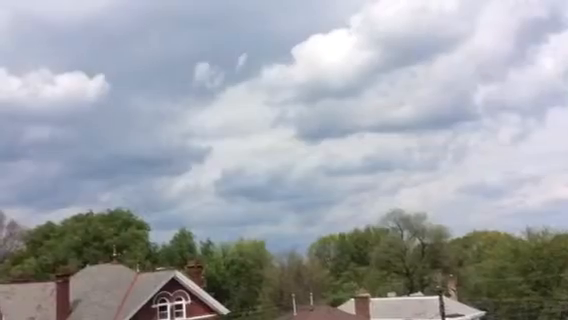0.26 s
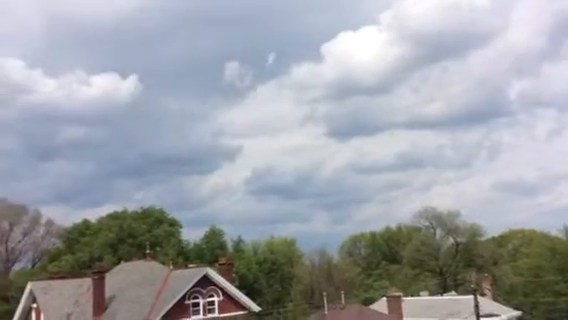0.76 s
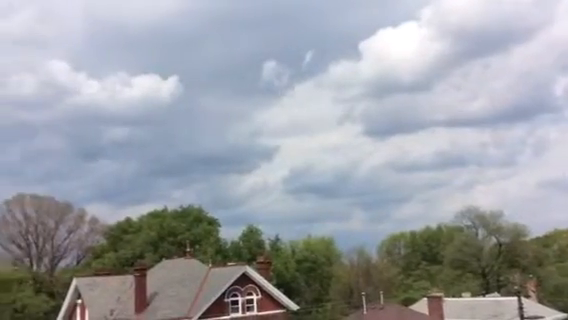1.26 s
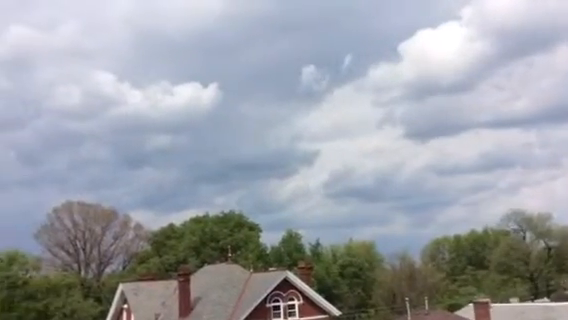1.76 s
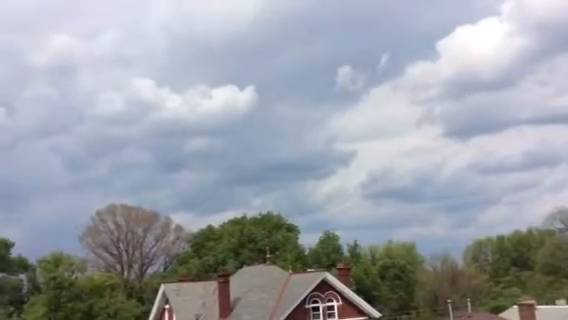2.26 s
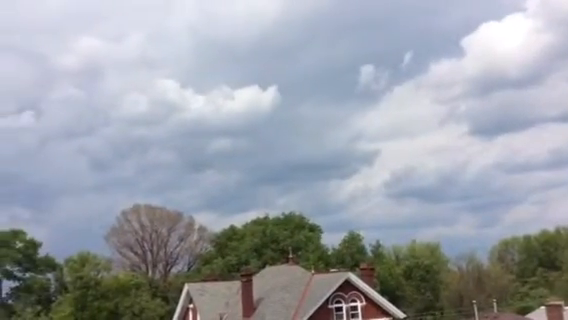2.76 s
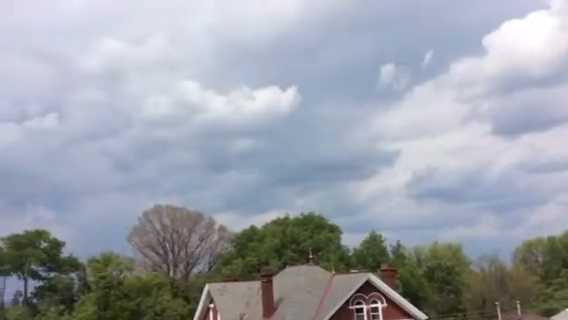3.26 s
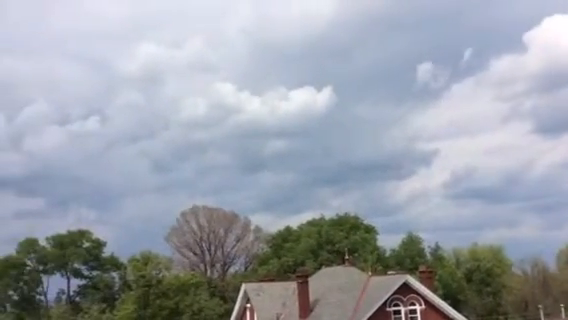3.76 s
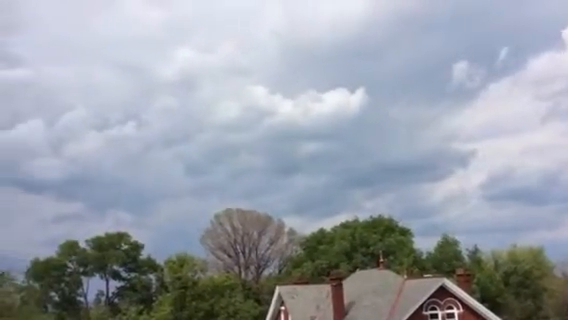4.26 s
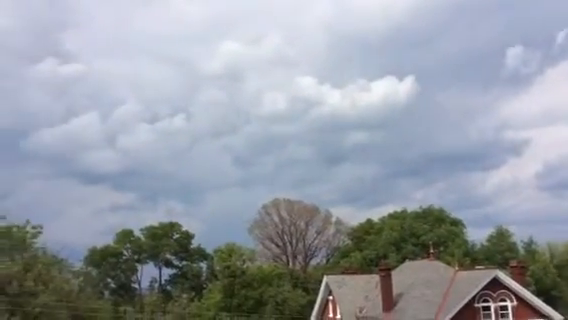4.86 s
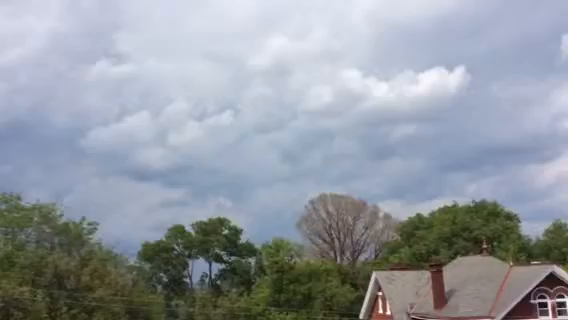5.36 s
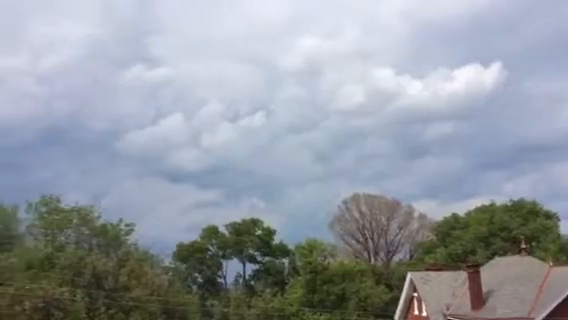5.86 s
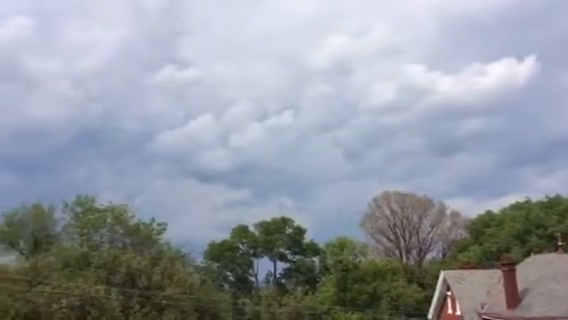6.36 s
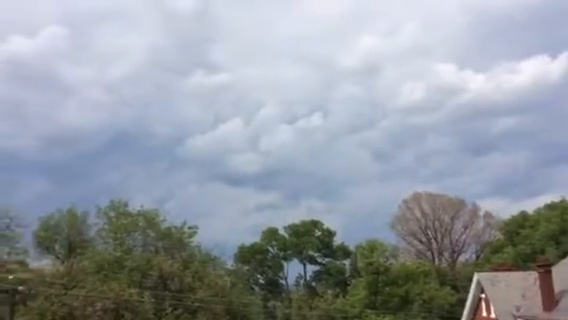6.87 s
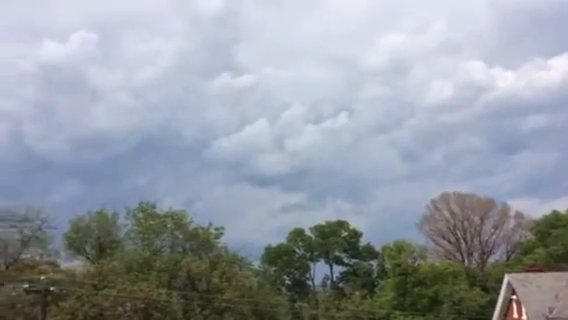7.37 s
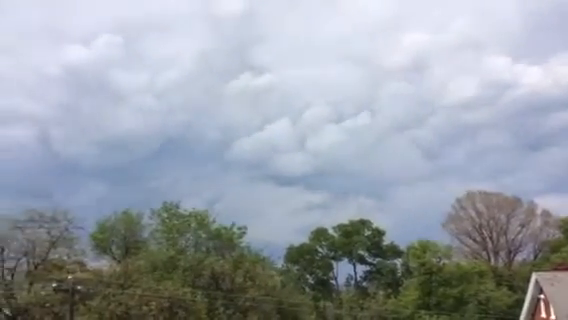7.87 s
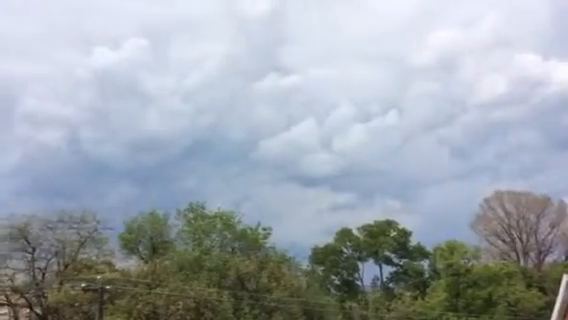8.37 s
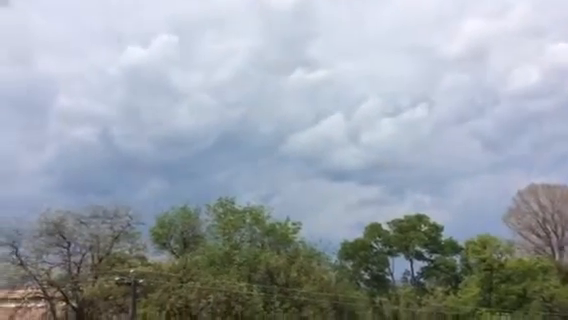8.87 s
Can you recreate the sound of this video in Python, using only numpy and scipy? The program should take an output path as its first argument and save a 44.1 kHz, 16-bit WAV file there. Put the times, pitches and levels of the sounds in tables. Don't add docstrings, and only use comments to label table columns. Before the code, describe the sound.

Outdoors above roofs and trees, a small single-channel microphone hears a street. From 0 s a low diesel drone sits under broad tyre roar and fan hiss, with a faint high whine sinking away; light rattles knock at 0.3 and 1 s. Between 1.6 and 2.2 s comes a dense clatter: hard knocks, dull thuds, a hollow panel boom, a short steel clank and piercing, tiny brake squeaks. Tyre noise recedes while the engine falls to a quiet low idle by 4 s; a second engine hums waveringly from 2 to 3.8 s. Squeaks return around 3.8-4.5 s with a swell of airy hiss, and a rattle at 4.9 s. From 5.3 s the engine rises; an air valve pops at 5.9 s and snaps brightly at 6.0 s. The pitch climbs until about 7.5 s, then holds as a steady drone with softer hiss until 9 s.

```python
import sys
import numpy as np
from scipy import signal
from scipy.fft import rfft, irfft, next_fast_len
from scipy.io import wavfile
from scipy.ndimage import uniform_filter1d, minimum_filter1d

SR = 44100
rng = np.random.default_rng(int(sys.argv[2]) if len(sys.argv) > 2 else 0)


def boost(x):
    u = np.asarray(x, float) / 20
    return 10 ** u


def to_wav(sig):
    pcm = np.clip(np.atleast_2d(sig), -1, 1) * 32767
    pcm = np.round(pcm).astype(np.int16)
    wavfile.write(sys.argv[1], SR, pcm.T)


N = 402633
TIME_S = np.arange(N) / SR


def rms_one(x):
    return x / np.sqrt(np.mean(x ** 2) + 1e-20)


def mix_db(*levels_db):
    return np.sqrt(sum(boost(db) ** 2 for db in levels_db))


def in_time(rows):
    s, *columns = np.transpose(rows)
    return [np.interp(TIME_S, s, c) for c in columns]


def drift(rate):
    step = 40
    r = np.exp(-2 * np.pi * rate * step / SR)
    coarse = rng.standard_normal(N // step + 2002)
    slow = signal.lfilter([1], [1, -2 * r, r * r], coarse)[2000:]
    return np.interp(np.arange(N) / step, np.arange(len(slow)), rms_one(slow))


def band_pass(x, order, low_hz, high_hz):
    return signal.sosfilt(signal.butter(order, [low_hz, high_hz], "band", fs=SR, output="sos"), x)


def ring(x, hz, t60_s):
    r, w = boost(-60 / (t60_s * SR)), 2 * np.pi * hz / SR
    return signal.lfilter([0, np.sin(w)], [1, -2 * r * np.cos(w), r * r], x + 1e-18)


def clicks(times_s, db):
    out = np.zeros(N)
    out[np.round(np.array(times_s) * SR).astype(int)] = boost(db)
    return out


def patchy_noise(spectrum, count, patchy_db, rate):
    size = next_fast_len(N)
    log_hz = np.log(np.maximum(np.fft.rfftfreq(size, 1 / SR), 1))
    table_hz, table_db = np.transpose(spectrum)
    table_log = np.log(table_hz)
    colour_db = np.interp(log_hz, table_log, table_db, left=-90, right=-90)
    coloured = rfft(rng.standard_normal(size)) * boost(colour_db)
    place = np.interp(log_hz, table_log[[0, -1]], [0, count - 1])
    together, out = drift(rate / 2), 0
    for k in range(count):
        share = np.clip(1 - abs(place - k), 0, 1)
        flicker_db = patchy_db * (0.65 * together + drift(rate))
        out = out + irfft(coloured * share, size)[:N] * boost(flicker_db)
    return rms_one(out)


# [time_s, firing_hz, load_db, tilt_db_per_order]
ENGINE_RUN = [(0.0, 34.72, -40.5, -2), (0.7, 32.94, -35.5, -2.5), (1.2, 34.83, -43, -2),
              (1.45, 32.4, -42, 3), (1.96, 30.73, -45, 6.5), (3.55, 21.04, -50, 5), (4.0, 20.19, -50, 3.5),
              (4.18, 22.45, -48, 9.5), (4.42, 26.14, -39.5, 1), (5.1, 23.38, -56.5, 9),
              (5.36, 27.86, -47, 14), (5.57, 32.1, -39, 1.5), (5.85, 37.82, -31, -1.5),
              (6.2, 43.86, -33, -2), (6.86, 51.95, -32, 2), (7.62, 54.7, -32, -2),
              (8.7, 54.42, -33.5, -1.5), (9.13, 55.57, -36, -0.5)]
# [multiple_of_firing, level_db]
ENGINE_ORDERS = [(1, -17), (1.5, -16.5), (2, -0.5), (2.5, -12.5), (3, 0.5), (4, -1), (5, -6), (6, -10.5),
                 (7, -9), (8, -10)]
# [freq_hz, gain_db]
EXHAUST_PIPE = [(45, -17), (68, -10), (105, 0.5), (132, -10.5), (160, -2), (215, -5.5), (270, -21),
                (500, -21.5)]
# [time_s, lift_db]
UNEVENNESS = [(0, 1), (6.5, -1), (7.5, 0), (8.2, 2.5), (9.13, 10)]


def engine():
    firing_hz, load_db, tilt_db = in_time(ENGINE_RUN)
    firing_hz = uniform_filter1d(firing_hz, size=9000)
    turn = 2 * np.pi * np.cumsum(firing_hz * (1 + 0.0022 * drift(4.2))) / SR
    pipe_hz, pipe_db = np.transpose(EXHAUST_PIPE)
    uneven_db, = in_time(UNEVENNESS)
    stumble_s, stumble_width_s, stumble_db = 8.27, 0.033, -5
    load_db = load_db + stumble_db * np.exp(-((TIME_S - stumble_s) / stumble_width_s) ** 2)
    notch_hz, notch_width_hz, notch_db = 133, 7.4, -5
    out = 0
    for k, db in ENGINE_ORDERS:
        half = k % 1 > 0
        order_hz = k * firing_hz
        level_db = load_db + db + tilt_db * (min(k, 10 - k) - 3)
        level_db = level_db + np.interp(np.log(order_hz), np.log(pipe_hz), pipe_db)
        level_db = level_db + notch_db * np.exp(-((order_hz - notch_hz) / notch_width_hz) ** 2)
        level_db = level_db + uneven_db * half + 0.85 * drift(11.3)
        level_db = level_db + (0.78 + 0.2 * k + 2.3 * half) * drift(3.1)
        phase = k * turn + (0.037 * k + 0.79 * half) * drift(3.8) + 1.1 * k ** 2
        out = out + boost(level_db) * np.cos(phase)
    return np.sqrt(2) * out


# [freq_hz, density_db_per_hz]
CASING_SPECTRUM = [(240, -21), (330, -2.5), (480, 2.5), (620, -16), (850, -24.5), (1080, -2.5),
                   (1350, -2.5), (1700, -12)]


def casing():
    load_db = in_time(ENGINE_RUN)[1]
    return boost(load_db - 22.5) * patchy_noise(CASING_SPECTRUM, count=3, patchy_db=0.4, rate=4.4)


# [time_s, nearness_db]
TRAFFIC_NEARNESS = [(0, -2), (.25, -1.5), (.9, -4.5), (1.3, -4), (1.6, -5), (3.0, -8), (4.2, -10),
                    (5.8, -12), (7.0, -12.5), (8.6, -11), (9.13, -9)]
# [time_s, boost_db]
BLOWER_BOOST = [(3.8, -17), (4.35, -3.5), (4.6, -3.5), (5.0, -8), (5.4, -1.5), (5.8, -0.5), (6.15, -2.5),
                (6.6, -2.5), (7.2, -8), (8.6, -9.5), (9.13, -13)]
# [freq_hz, density_db_per_hz]
RUMBLE_SPECTRUM = [(25, -18), (50, -6), (90, -1.5), (180, 3), (230, -2), (300, -19)]


def rumble():
    (near_db,), (boost_db,) = in_time(TRAFFIC_NEARNESS), in_time(BLOWER_BOOST)
    gain = mix_db(-42 + 0.054 * near_db, -43 + boost_db) + boost(-56.5) * drone_there()
    return gain * patchy_noise(RUMBLE_SPECTRUM, count=4, patchy_db=1.0, rate=5.7)


# [freq_hz, density_db_per_hz]
ROAR_SPECTRUM = [(200, -28), (270, -0.5), (400, -2.5), (560, -2), (800, -5.5), (1000, -13), (1500, -46)]
# [freq_hz, density_db_per_hz]
TYRE_SPECTRUM = [(700, -7), (900, 0.5), (1065, 3), (1350, -2.5), (1900, -7), (2600, -11.5), (3300, -16),
                 (4200, -57)]


def tyres():
    near_db, = in_time(TRAFFIC_NEARNESS)
    roar = patchy_noise(ROAR_SPECTRUM, count=4, patchy_db=1.48, rate=18.0)
    tread = patchy_noise(TYRE_SPECTRUM, count=3, patchy_db=0.96, rate=12.7)
    return boost(-37.5 + 1.052 * near_db) * roar + boost(-39 + 1.15 * near_db) * tread


# [pitch_hz, width_hz, level_db_re_hiss]
DUCT_WHISTLES = [(1065, 70, -7), (1280, 110, -11), (1720, 140, -14), (3250, 160, -17), (3680, 150, -16),
                 (5650, 120, -18), (8300, 180, -17)]


def whistles():
    out = 0
    for hz, width_hz, db in DUCT_WHISTLES:
        t60_s = 3.3 / width_hz
        tone = ring(ring(rng.standard_normal(N), hz, t60_s), hz, t60_s)
        out = out + boost(db - 2.5 + 3 * drift(1.5)) * rms_one(tone)
    return out


# [freq_hz, density_db_per_hz]
HISS_SPECTRUM = [(1500, -5), (2000, -1.5), (2700, 1), (4000, 2.5), (6100, -2.5), (7900, -5.5),
                 (10000, -6.5), (12000, -32)]


def hiss():
    (near_db,), (boost_db,) = in_time(TRAFFIC_NEARNESS), in_time(BLOWER_BOOST)
    air = patchy_noise(HISS_SPECTRUM, count=6, patchy_db=1.54, rate=17.4) + whistles()
    return mix_db(-48.5 + near_db, -50 + boost_db) * air


# [time_s, level_db]
BRAKE_PRESSURE = [(0, -53), (1.55, -58), (2.4, -56.5), (2.9, -59), (3.9, -58.5), (4.2, -52.5), (4.45, -50),
                  (4.7, -57), (5.0, -59), (5.5, -60.5), (6.2, -67), (7.2, -70), (7.75, -63), (9.13, -89)]
# [freq_hz, density_db_per_hz]
RUSTLE_SPECTRUM = [(7600, -13), (8100, 1), (8600, 3.5), (9200, 1.5), (10300, -2.5), (11500, -14),
                   (13000, -21)]


def rustle():
    brake_db, = in_time(BRAKE_PRESSURE)
    return boost(brake_db) * patchy_noise(RUSTLE_SPECTRUM, count=4, patchy_db=2.0, rate=25.0)


def spray():
    near_db, = in_time(TRAFFIC_NEARNESS)
    boost_db, = in_time(BLOWER_BOOST)
    brake_db, = in_time(BRAKE_PRESSURE)
    gain = mix_db(-79 + 0.13 * near_db, -56.5 + boost_db, -11 + brake_db)
    spectrum = [(8500, -14), (10500, 0), (11500, 0.5), (13000, -3.5), (15400, -9)]      # Hz, dB per Hz
    return gain * patchy_noise(spectrum, count=3, patchy_db=0.7, rate=8.6)


# [time_s, pitch_hz, level_db]
BLOWER_WHINE = [
    (0, 9000, -59),
    (.7, 8300, -59),
    (1.5, 8150, -63),
    (2.0, 8100, -85),
]


def whine():
    hz, level_db = in_time(BLOWER_WHINE)
    turn = 2 * np.pi * np.cumsum(hz + 35 * drift(60)) / SR
    return boost(level_db + 3 * drift(15)) * np.sin(turn)


# [start_s, length_s, first_hz, last_hz, level_db]
GLIDING_STRANDS = [(0, 0.26, 4620, 4650, -62), (.85, 0.4, 5620, 5600, -63), (4.55, 0.57, 212, 208.3, -47),
                   (.6, 0.57, 168, 166.5, -47), (1.6, .75, 243, 228.5, -49), (.3, 0.32, 218, 223.5, -46.5),
                   (3.65, 0.88, 198, 190, -50), (0, 1.5, 2570, 2560, -59), (0.103, 1.1, 3320, 3260, -62),
                   (3.8, 0.13, 2560, 2540, -61), (3.82, 0.18, 3550, 3600, -63),
                   (3.957, 0.092, 2550, 2520, -63), (4.021, .4, 5000, 4800, -61.5),
                   (4.27, 0.3, 4030, 3930, -61), (4.49, 0.2, 2040, 2200, -57),
                   (4.749, 0.13, 2200, 2043, -59), (4.869, .1, 2250, 2146, -62),
                   (4.94, 0.16, 2720, 2800, -62), (4.979, 0.091, 2050, 1995, -58),
                   (5.118, 0.19, 5700, 5600, -63), (5.199, 0.13, 2620, 2690, -60),
                   (5.4, 0.37, 2300, 2630, -60), (5.396, 0.55, 4030, 3950, -61),
                   (5.7, 0.58, 3790, 3730, -61), (5.8, .7, 2930, 2940, -65), (6.301, 1.09, 3702, 3610, -66),
                   (7.7, 1.21, 8200, 8250, -73)]


def strands():
    out = np.zeros(N)
    settle = 4000
    for s, length_s, first_hz, last_hz, level_db in GLIDING_STRANDS:
        at, t = round(s * SR), np.linspace(0, 1, round(length_s * SR))
        width_hz = min(52 + 50 * length_s, .03 * first_hz)
        narrow = signal.butter(2, width_hz, fs=SR, output="sos")
        a, b = signal.sosfilt(narrow, rng.standard_normal((2, len(t) + settle)))[:, settle:]
        turn = 2 * np.pi * np.cumsum(first_hz + (last_hz - first_hz) * t) / SR
        steady = 1.16 * a.std()
        tone = rms_one((a + steady) * np.cos(turn) + b * np.sin(turn))
        swell = np.clip(np.minimum(t / .2 + (s == 0), (1 - t) / .35), 0, 1)
        out[at:at + len(t)] += boost(level_db) * swell * tone
    return out


# [start_s, length_s, pitch_hz, level_db]
BRAKE_SQUEAKS = [(1.481, 0.079, 12530, -52.5), (1.941, .04, 8300, -53), (1.79, 0.15, 14920, -46),
                 (1.942, 0.1, 9970, -52), (1.96, 0.077, 12750, -54), (2.15, 0.093, 10420, -50),
                 (2.154, .07, 14900, -59), (2.313, 0.084, 14900, -51), (2.322, 0.23, 9400, -59),
                 (2.967, 0.073, 11130, -61), (3.177, 0.089, 11100, -52), (3.276, 0.064, 9970, -52.5),
                 (3.78, 0.068, 12550, -56), (3.873, 0.11, 12420, -45.5), (3.947, 0.16, 14230, -56),
                 (4.039, 0.082, 12400, -46.5), (4.077, 0.084, 9950, -58), (4.173, 0.096, 10500, -52.5),
                 (4.235, .12, 13900, -59), (4.31, .22, 10800, -60), (4.352, 0.052, 12300, -49),
                 (4.394, 0.16, 12440, -55), (4.5, 0.097, 8340, -56), (4.72, 0.021, 9770, -58),
                 (4.855, 0.085, 14900, -65), (4.94, 0.067, 8300, -54)]
# [start_s, length_s, pitch_hz, level_db]
LOWER_CHIRPS = [(.01, .16, 172, -46), (.325, .04, 3500, -52), (1.58, .04, 3540, -54),
                (1.58, .03, 5800, -59), (1.703, .03, 5700, -60), (1.94, .025, 5270, -54),
                (1.938, 0.055, 3520, -46), (2.181, .035, 3564, -54), (4.59, .03, 2750, -64),
                (4.64, .04, 3850, -63), (4.7, .04, 2750, -56), (4.72, 0.04, 3330, -57),
                (4.7, .12, 750, -55), (4.932, 0.071, 3710, -57.5), (6.015, .06, 3500, -53),
                (1.985, .04, 4150, -52), (2.205, .03, 560, -44), (2.08, .035, 450, -44)]
# [start_s, pitch_hz, level_db]
DULL_THUDS = [(1.654, 550, -40.5), (1.654, 1400, -44), (1.75, 1350, -45), (1.77, 235, -37),
              (1.785, 1250, -47), (1.94, 430, -41), (1.957, 232, -40), (2.055, 480, -43),
              (2.065, 1050, -46), (2.58, 600, -46)]


def squeaks():
    out, white = np.zeros(N), rng.standard_normal(N)
    flutter, wobble = boost(2.8 * drift(53)), 0.008 * drift(30)
    thud_length_s, settle = 0.043, 400
    thuds = [(s, thud_length_s, hz, db) for s, hz, db in DULL_THUDS]
    for s, length_s, hz, level_db in BRAKE_SQUEAKS + LOWER_CHIRPS + thuds:
        at, t = round(s * SR), np.linspace(0, 1, round(length_s * SR))
        here = slice(at, at + len(t))
        t60_s = 4.3 / (80 + 0.029 * hz + 110.0 * (300 < hz < 1800))
        once = ring(white[at - settle:at + len(t)], hz, t60_s)
        twice = ring(once, hz, t60_s)
        tone = rms_one(rms_one(twice[settle:]) + .4 * rms_one(once[settle:]))
        shift = 2 * np.pi * np.cumsum(hz * (hz > 8000) * wobble[here]) / SR
        tone = np.real(signal.hilbert(tone) * np.exp(1j * shift))
        swell = 1.2 * np.sin(np.pi * t ** .7) ** 1.3
        out[here] += boost(level_db) * swell * tone * flutter[here]
    return out


# [start_s, rattle_peak_db, boom_db_re_rattle]
BODY_KNOCKS = [(0.2494, -31, -16), (0.3721, -30, -12), (0.9705, -32, -21), (1.3398, -43, 3.5),
               (1.652, -30, -19), (1.754, -34, -6), (1.946, -34, -9), (1.958, -40, 5), (1.974, -40.5, 4.5),
               (1.9883, -45, -3), (2.056, -34, 1.5), (2.183, -34, -2.5), (2.5795, -41, -16),
               (2.8001, -55, -7), (3.109, -49, 11), (4.187, -60, -9), (4.935, -34.5, -8),
               (5.6204, -34, -21), (6.2689, -53, -14), (6.5598, -46, -10)]
# [freq_hz, level_db, t60_s]
PANEL_MODES = [(229.4, 3, 0.28), (147, -7, 0.18), (327, -25, 0.085), (458, -4, 0.17), (593, 0, 0.022),
               (1430, -7, 0.025)]
# [freq_hz, level_db, t60_s]
CLANK_MODES = [(1973, -4.5, 0.85), (3260, -12, 0.083), (4110, -7, 0.074), (4470, -13, 0.14),
               (6700, -12.5, 0.094)]


def knocks():
    s, rattle_db, boom_db = np.transpose(BODY_KNOCKS)
    t = np.arange(2500) / SR
    shake = (1 - np.exp(-t / 0.002)) * np.exp(-t / 0.024)
    burst = signal.fftconvolve(clicks(s, rattle_db - 14.0), shake)[:N] * rng.standard_normal(N)
    rattle = signal.lfilter([1.5], [1, -.45], band_pass(burst, 2, 300, 9500))
    panels = 0
    for hz, db, t60_s in PANEL_MODES:
        hit_db = rattle_db + boom_db + db + rng.normal(0, 1, len(s))
        panels = panels + ring(clicks(s, hit_db), hz, t60_s)
    clank_s, clank_db = 1.99, -33
    clank = sum(ring(clicks([clank_s], clank_db + db), hz, t60_s) for hz, db, t60_s in CLANK_MODES)
    clank = clank * np.interp(TIME_S, [2.06, 2.085, 2.15], [1, .35, 0])
    return rattle + signal.lfilter([.3], [1, -.7], panels) + clank


# [start_s, peak_db, pitch_hz]
HARD_TICKS = [(1.652, -25, 530), (1.657, -29, 400), (1.708, -30, 447), (1.919, -31, 380), (1.947, -28, 431),
              (1.664, -32, 1310), (1.677, -28, 528), (1.772, -30, 474), (1.802, -36, 1330),
              (1.955, -24, 428), (2.059, -24, 441), (2.074, -29, 468)]


def ticks():
    s, db, _ = np.transpose(HARD_TICKS)
    crack = band_pass(clicks(s, db + 4), 2, 700, 7000)
    return crack + sum(ring(clicks([at], level_db - 3), hz, 0.025) for at, level_db, hz in HARD_TICKS)


def drone_there():
    return np.interp(TIME_S, [1.8, 1.95, 3.7, 3.85], [0, 1, 1, 0])


# [time_s, drone_hz, level_db]
SECOND_ENGINE = [(1.85, 118.6, -36), (2.05, 123, -50), (2.31, 143.9, -36), (2.44, 142, -46),
                 (2.54, 136.5, -34), (2.66, 147, -49), (2.8, 150.9, -42), (3.3, 152, -41),
                 (3.42, 146.5, -54), (3.6, 133, -39), (3.75, 130.6, -47)]


def drone():
    hz, level_db = in_time(SECOND_ENGINE)
    tone = np.sin(2 * np.pi * np.cumsum(hz) / SR)
    return np.sqrt(2) * drone_there() * boost(level_db + drift(2.5)) * tone


def boom():
    boom_s, boom_db, boom_hz, swell_s = 1.979, -22.5, 233.2, 0.017
    t = TIME_S - boom_s
    return boost(boom_db) * np.exp(-abs(t) / swell_s) * np.cos(2 * np.pi * boom_hz * t)


# [start_s, peak_db]
VALVE_SNAPS = [
    (6.0105, -20.5),
    (6.014, -33),
    (6.018, -32),
]
# [freq_hz, level_db, t60_s]
VALVE_MODES = [(3570, -35, 5.0), (6170, -5, 0.046), (6680, -41, 5.0), (8300, -3.5, 0.033),
               (9100, -0.5, 0.04), (9340, 2.5, 0.035), (11900, -10, 0.036), (12200, -3, 0.036),
               (12550, -3, 0.033), (13100, -16, 0.037), (13980, -22, 0.063), (14240, -20, 0.058)]


def valve():
    pop_s, pop_db = 5.8942, -17.5
    t = np.arange(600) / SR
    push = 1.33 * np.exp(-abs(t - .0012) / 0.00063)
    push = push + 0.18 * np.exp(-abs(t - .001) / 0.0011) * rng.standard_normal(600)
    pop = band_pass(np.convolve(clicks([pop_s], pop_db), push)[:N], 1, 70, 9000)
    puff = 1.17 * np.exp(-((t - .0017) / 0.00099) ** 2) * rng.standard_normal(600)
    puff[round(.002 * SR)] += 11.0
    s, peak_db = np.transpose(VALVE_SNAPS)
    air = np.convolve(clicks(s, peak_db - 26.5), puff)[:N]
    snap = sum(boost(db) * ring(air, hz, min(t60_s, .03) * 0.23) for hz, db, t60_s in VALVE_MODES)
    snap = band_pass(snap, 3, 4000, 14500)
    crack = boost(15) * band_pass(air, 4, 11500, 14000)
    body = ring(clicks([s[0] + 0.00208], -27), 620, 0.012)
    body = body + ring(clicks([s[0] + 0.0021], -37), 1300, 0.012)
    middle = ring(air, 4300, 0.016) + ring(air, 2500, .01) + ring(air, 5400, 0.016)
    return pop + snap + crack + body + boost(-14) * middle


def scene():
    street = rumble() + tyres() + hiss() + rustle() + spray()
    linkage = strands() + squeaks()
    jolts = knocks() + ticks() + boom()
    return (engine() + casing() + street + whine() + linkage + jolts + drone() + valve())[None]


def thin_spectrum(x):
    lead, hop = 377, 1024
    hz, _, frames = signal.stft(np.pad(x, (lead, 0)), SR, "cosine", nperseg=2 * hop)
    power, hz = abs(frames[:hop]) ** 2, hz[:hop]
    groups = power.reshape(64, 16, -1)
    band = np.repeat(groups.mean(axis=1), 16, axis=0)
    typical = np.repeat(np.median(groups, axis=1), 16, axis=0) / np.log(2)
    chance = np.repeat(rng.standard_normal((64, power.shape[1])), 16, axis=0)
    floor = np.interp(hz, [250, 600, 9000, 12000, 14500], [0, .28, .3, .5, 1.6])[:, None]
    keep = power > floor * typical * boost(3.0 * chance)
    above = np.maximum.accumulate(band * (hz > 10300)[:, None], axis=0)
    surge = uniform_filter1d(above, size=3, axis=1) / np.median(above, axis=1)[:, None]
    loudest = above * np.clip(surge / 2.5, .3, 6)
    mask_share = np.interp(hz, [10500, 11500, 15000], [0, .005, .006])[:, None]
    masked = band < loudest * mask_share * boost(5 * chance)
    bright = abs(signal.sosfilt(signal.butter(2, 300, "high", fs=SR, output="sos"), x))
    crest = -minimum_filter1d(-bright, size=1800) / uniform_filter1d(bright, size=8192)
    centres = np.minimum(np.arange(power.shape[1]) * hop, N + lead - 1) - lead
    sudden = crest[centres] > 9
    frames[:hop] *= np.where(keep & ~masked | sudden, 1, .003)
    return signal.istft(frames, SR, "cosine", nperseg=2 * hop)[1][lead:N + lead]


def roll_off(x):
    return signal.sosfilt(signal.butter(12, 15380, fs=SR, output="sos"), x)


def record(dry):
    top_cut = signal.cheby2(14, 60, 15900, fs=SR, output="sos")
    mix = signal.sosfilt(top_cut, thin_spectrum(dry[0]))[None]
    return roll_off(mix)


dry = scene()
out = record(dry)
to_wav(out)
```